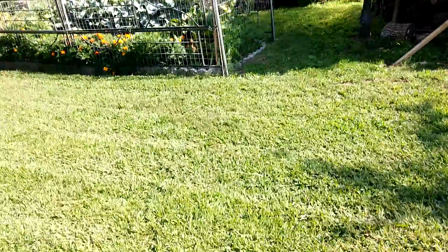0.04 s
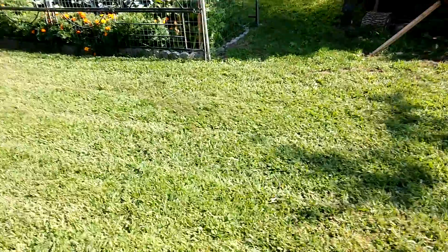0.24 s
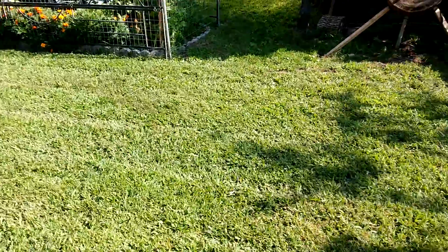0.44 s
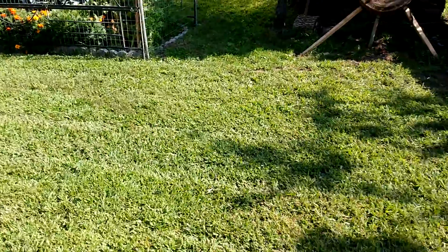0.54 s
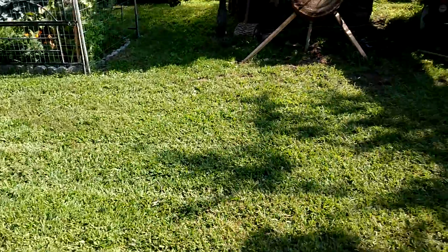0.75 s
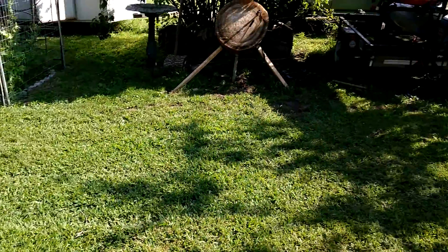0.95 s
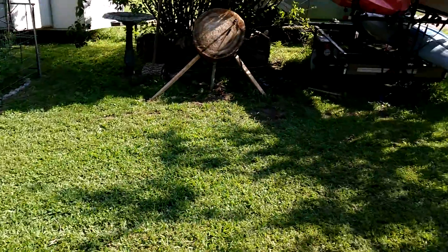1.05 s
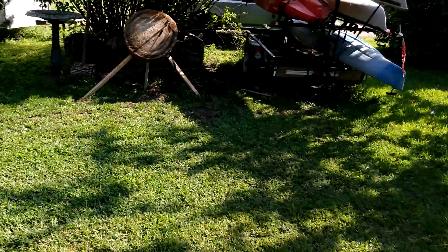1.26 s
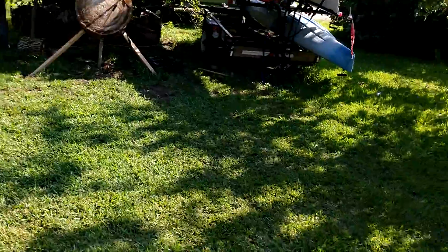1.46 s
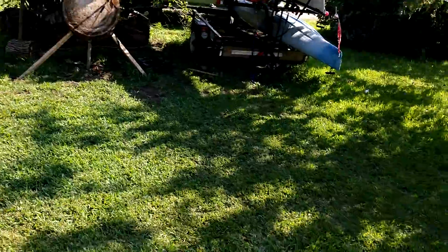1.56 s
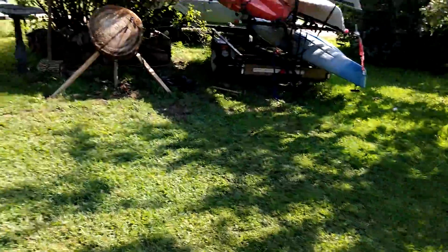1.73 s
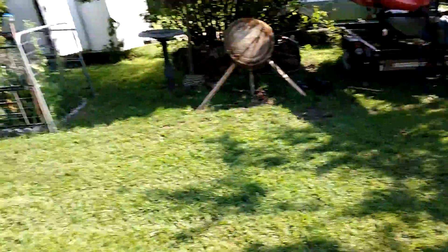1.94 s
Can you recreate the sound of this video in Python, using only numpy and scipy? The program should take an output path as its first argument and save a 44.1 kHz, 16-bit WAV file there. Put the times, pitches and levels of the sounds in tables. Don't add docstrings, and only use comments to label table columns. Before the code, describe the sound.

A thrown knife hits a wooden block with one hard, cracking knock in a quiet backyard.

```python
import sys
import numpy as np
from scipy import signal
from scipy.fft import rfft, irfft
from scipy.io import wavfile

SR = 44100
rng = np.random.default_rng(int(sys.argv[2]) if len(sys.argv) > 2 else 0)


def gain_from_db(level_db):
    decades = np.asarray(level_db, float) / 20
    return 10 ** decades


def store_wav(level_fs):
    pcm = np.round(np.clip(np.atleast_2d(level_fs), -1, 1) * 32767)
    wavfile.write(sys.argv[1], SR, pcm.T.astype(np.int16))


N = 88200

# start in seconds, level in dB,
# lowest pitch in Hz, brightness limit in Hz.
KNOCKS = [
    (0.2414, 1, 60, 2000),
    (.2440, -4, 900, 4500),
    (.2490, -6, 700, 5000),
    (.2545, -11, 1500, 5000),
    (.2625, -14, 1200, 5080),
]


def at_hz(points, hz):
    table = np.array(points)
    return np.interp(np.log(hz), np.log(np.maximum(table[:, 0], 1)), table[:, 1])


def rms_one(x):
    return x / np.sqrt(np.mean(x ** 2) + 1e-20)


def drift(rate_hz):
    r = np.exp(-80 * np.pi * rate_hz / SR)
    slow = signal.lfilter([1], [1, -2 * r, r * r], rng.standard_normal(N // 40 + 2002))
    slow = slow[2000:]
    return np.interp(np.arange(N) / 40, np.arange(len(slow)), rms_one(slow))


def ring(x, hz, t60):
    r, w = gain_from_db(-60 / (t60 * SR)), 2 * np.pi * hz / SR
    return signal.lfilter([0, np.sin(w)], [1, -2 * r * np.cos(w), r * r], x + 1e-18)


def coloured(spectrum, alike):
    hz = np.maximum(np.arange(N // 2 + 1) * SR / N, 1)
    octaves_below = np.maximum(np.log2(spectrum[0][0] / hz), 0)
    octaves_above = np.maximum(np.log2(hz / spectrum[-1][0]), 0)
    level_db = at_hz(spectrum, hz) - 12.76 * (octaves_below + octaves_above)
    alike = np.clip(at_hz(alike, hz) if np.ndim(alike) else alike, -.99, .99)
    mid, side = rfft(rng.standard_normal((2, N)))
    pair = np.sqrt(1 + alike) * mid + np.sqrt(1 - alike) * side * [[1], [-1]]
    return rms_one(irfft(pair * gain_from_db(level_db), N))


def dying(start, t60, rise):
    t = np.maximum(np.arange(N) / SR - start, 0)
    return (1 - np.exp(-t / rise)) * gain_from_db(-60 * t / t60)


def burst(s, db, hz, t60, grit_s):
    out, kick = np.zeros(N), np.zeros(SR // 10)
    kick[:400] = rng.standard_normal(400) * np.exp(-np.arange(400) / SR / grit_s)
    tick = ring(ring(kick, hz, t60), hz, t60 / 2)
    start = int(s * SR)
    out[start:start + len(tick)] = gain_from_db(db) * tick / np.abs(tick).max()
    return out


def air():
    # pitch in Hz, level in dB per Hz.
    air_spectrum = [(150, -33), (250, -10.5), (360, -14.5), (586, -14), (697, -18), (3050, -25),
                    (4400, -34), (4960, -32.5), (15900, -51.5)]
    # pitch in Hz, left-right likeness from -1 to 1.
    likeness = [(60, 0.96), (180, 0.7), (550, 0.64), (1650, -0.5), (4970, -0.23), (15000, -0.02)]
    return gain_from_db(-54.5 + 0.52 * drift(2.1)) * coloured(air_spectrum, likeness)


def traffic():
    # pitch in Hz, level in dB per Hz.
    rumble_spectrum = [(15, -44.5), (25, 5.5), (92, -3), (129, -6.5), (147, -0.5), (172, -15.5),
                       (232, -18.5), (264, -38.5), (320, -43), (420, -66), (700, -120)]
    # time in seconds, swell in dB.
    rumble_swell = [(0, -1), (.1, 4), (.27, 1.5), (.35, 7), (.42, 3), (0.522, -1.5), (0.601, 3), (.75, 2),
                    (.85, 2), (.98, 1.5), (1.1, 0.5), (1.3, -4.5), (1.45, -1), (1.55, -2.5), (1.62, 1),
                    (1.699, -0.5), (1.85, 1.5), (2, 1.5)]
    level_db, pan_db = -39, 0.8
    swell_db = np.interp(np.arange(N) / SR, *np.transpose(rumble_swell))
    rumble = gain_from_db(level_db + swell_db + 2.2 * drift(7.7)) * coloured(rumble_spectrum, 0.95)
    return rumble * gain_from_db([[pan_db], [-pan_db]])


def machinery():
    # pitch in Hz, wander in Hz, level in dB.
    drones = [
        (126.8, 4.6, -42),
        (233.4, 2.5, -51.5),
    ]
    # time in seconds, level in dB.
    drone_swell = [(0, 0), (.1, -1.5), (.4, -1.5), (.65, -12), (.88, -2), (0.951, 0.5), (1.1, 3),
                   (1.251, 3.5), (1.381, 5.5), (1.498, -2.5), (1.621, 1.5), (1.77, 4), (1.9, -3.5), (2, -7)]
    swell = gain_from_db(np.interp(np.arange(N) / SR, *np.transpose(drone_swell)))
    out = np.zeros(N)
    for (hz, width_hz, db), gain in zip(drones, (swell, 1)):
        cycles = np.cumsum(hz + width_hz * drift(9.8)) / SR
        out += gain_from_db(db + 3.2 * drift(24)) * gain * np.sqrt(2) * np.sin(2 * np.pi * cycles)
    return out


def ticks():
    # start in seconds, pitch in Hz, 60 dB decay in seconds, pan in dB.
    clicks = [(.0342, 5800, .005, 0), (.0342, 2400, .002, 0), (.0342, 8000, .0005, 0),
              (.7925, 1800, .008, 3), (.7925, 2900, .002, 3), (1.3011, 1400, .0045, -3),
              (1.3009, 5900, .003, -3), (1.3020, 4500, .004, -3), (.565, 13500, .0007, 0),
              (.748, 9000, .001, 0), (1.557, 15300, .002, 0), (1.61, 13000, .002, 0),
              (.0342, 13500, .0005, 0)]
    click_db = [-39.5, -41.5, -43, -37, -47, -26.5, -40, -46.5, -60, -53, -44.5, -64, -57]
    out = np.zeros((2, N))
    for (s, hz, t60, pan_db), db in zip(clicks, click_db):
        out += burst(s, db, hz, t60, grit_s=.0002) * gain_from_db([[pan_db], [-pan_db]])
    return out


def touch_and_slaps():
    # start in seconds, pitch in Hz, 60 dB decay in seconds; the first is the tip.
    echoes = [(.2399, 2800, .003), (.3096, 3150, .007), (.3105, 900, .006), (.3152, 450, .006),
              (.3171, 1650, .01), (.3171, 2200, .0015), (.324, 1700, .012), (.346, 2200, .01),
              (.363, 1580, .02), (.364, 900, .015), (.368, 2400, .012), (.377, 1700, .02),
              (.386, 2900, .01)]
    echo_db = [-23, -22, -29, -26, -19, -20, -26, -32, -31, -33, -37, -38, -41]
    pan_db = 2
    slaps = sum(burst(s, db, hz, t60, grit_s=.0003) for (s, hz, t60), db in zip(echoes, echo_db))
    return slaps * gain_from_db([[pan_db], [-pan_db]])


def block_rings():
    # pitch in Hz, level in dB, 60 dB decay in seconds.
    modes = [(175, -4.5, 0.027), (312, -9.5, 0.035), (489.3, -10, 0.077), (612.7, 2, 0.044),
             (841, -2, 0.031), (983, -4, 0.05), (1104, -4, 0.025), (1267, -2.5, .04), (1652, -6, 0.06),
             (2070, -7, 0.087), (2261, -4, .065), (2455, -2, .065), (3022, -3.5, 0.05), (3163, -5.5, 0.078)]
    level_db, spread_db = -9.5, 3
    strengths = rng.standard_normal((len(KNOCKS), len(modes) + 1))
    strengths[0, :-1] = 1e-3
    strengths[0, -1] = -1
    body = np.zeros(N)
    for (s, db, low_hz, cut_hz), row in zip(KNOCKS, strengths):
        click, rings = np.zeros(SR // 5), 0
        click[0] = gain_from_db(db + level_db)
        for (hz, mode_db, t60), z in zip(modes, row):
            push = np.sign(row[-1] * z) * gain_from_db(mode_db + spread_db * z)
            rings = rings + push * ring(click, hz, t60)
        soft = signal.butter(2, [low_hz, cut_hz], "band", fs=SR, output="sos")
        start = int(s * SR)
        body[start:start + len(click)] += signal.sosfilt(soft, rings)
    return body


def wood_crack():
    # pitch in Hz, level in dB per Hz.
    crack_spectrum = [(100, -15), (300, -11.5), (600, -1), (2500, -1.5), (3800, -10), (6500, -26.5),
                      (8500, -40), (15800, -39.5)]
    shape = sum(gain_from_db(db) * dying(s, t60=0.09, rise=0.00092) for s, db, _, _ in KNOCKS)
    return gain_from_db(-13) * shape * coloured(crack_spectrum, 0.26)


def yard_tail():
    # pitch in Hz, level in dB per Hz.
    yard_spectrum = [(180, -18), (400, -9), (750, -6), (1640, -7), (2410, -8.5), (4000, -17), (7000, -38),
                     (12000, -55.5)]
    shape = dying(KNOCKS[0][0], t60=0.44, rise=0.026) * gain_from_db(2.3 * drift(27))
    return gain_from_db(-21) * shape * coloured(yard_spectrum, 0.18)


def ports(x):
    # pitch in Hz, left minus right in dB.
    balance = [(200, -.5), (700, -2), (1300, 3), (2400, 6.5), (4400, 0), (6500, -9), (9000, -14),
               (13000, -1)]
    lag_s = -.00028
    hz = np.arange(N // 2 + 1) * SR / N
    tilt = at_hz(balance, np.maximum(hz, 1)) / 2
    lag = np.exp(-2j * np.pi * hz * lag_s)
    return irfft(rfft(x) * [gain_from_db(tilt), gain_from_db(-tilt) * lag], N)


def knock():
    return touch_and_slaps() + ports(block_rings() + wood_crack() + yard_tail())


def chirps():
    # start in seconds, length in seconds, pitch in Hz, arch in Hz.
    whistles = [
        (.407, .027, 5900, 1700),
        (.441, .018, 6150, 40),
        (.455, .018, 5350, 30),
        (.47, .016, 5900, 500),
        (.487, .05, 4850, 40),
        (.499, .013, 5350, 30),
    ]
    whistle_db = [-63, -56, -58, -67, -61, -57]
    echo_s, echo_db = 0.034, -13
    out, t = np.zeros(N), np.arange(N) / SR
    waver_hz = 130 * drift(248)
    for (s, length, hz, arch_hz), db in zip(whistles, whistle_db):
        u = np.clip((t - s) / length, 0, 1)
        arch = np.sin(np.pi * u)
        cycles = np.cumsum(hz + arch_hz * arch + waver_hz) / SR
        out += gain_from_db(db) * arch ** 0.163 * np.sin(2 * np.pi * cycles)
    echoes = [gain_from_db(echo_db - 4.8 * k) * np.roll(out, int(echo_s * SR * (1.1 + 1.8 * k))) for k in range(6)]
    return (out + sum(echoes)) * gain_from_db([[-1.5], [1.5]])


def rubs():
    # start in seconds, length in seconds, start pitch in Hz, end pitch in Hz.
    strokes = [
        (.79, .055, 1750, 1850),
        (.835, .115, 1550, 1500),
        (.845, .045, 750, 600),
        (.8, .36, 3200, 3200),
        (1.21, .06, 1750, 1900),
        (1.52, .15, 2150, 2300),
        (1.63, .095, 2750, 2750),
        (1.51, .19, 5800, 5300),
        (1.52, .18, 800, 700),
        (1.86, .11, 1900, 1750),
    ]
    stroke_db = [-50.5, -54.5, -45.5, -63, -62.5, -51.5, -57.5, -66.5, -56, -53]
    stroke_q = [5, 3, 1.2, 2.5, 9, 6, 9, 2.5, 1.3, 3]
    attack_s, pan_db = .015, 4
    out = np.zeros((2, N))
    for (s, length, hz0, hz1), db, q in zip(strokes, stroke_db, stroke_q):
        i, j = int(s * SR), int((s + length) * SR)
        u = np.arange(j - i) / (j - i)
        narrow = signal.butter(2, hz0 / q / 2, fs=SR, output="sos")
        noise = signal.sosfilt(narrow, rng.standard_normal((4, SR // 2)))
        a, b, c, d = noise[:, 500:500 + j - i]
        phase = 2 * np.pi * np.cumsum(hz0 + (hz1 - hz0) * u) / SR
        mid = a * np.cos(phase) + b * np.sin(phase)
        side = c * np.cos(phase) + d * np.sin(phase)
        shape = np.minimum(u * length / attack_s, 1) * np.sqrt(1 - u ** 2)
        out[:, i:j] += gain_from_db(db) * shape * rms_one(np.array([mid + 0.46 * side, mid - 0.91 * side]))
    return out * gain_from_db([[pan_db], [-pan_db]])


def coo():
    # time in seconds, pitch in Hz, level in dB.
    call = [(1.0, 600, -75), (1.1, 593.5, -59), (1.17, 571, -70), (1.22, 610, -56), (1.29, 651, -60),
            (1.35, 591, -58), (1.401, 610, -59), (1.45, 600, -80)]
    t = np.arange(N) / SR
    s, hz, db = np.transpose(call)
    level = gain_from_db(np.interp(t, s, db) + 3.3 * drift(25)) * (t > s[0]) * (t < s[-1])
    return level * np.sin(2 * np.pi * np.cumsum(np.interp(t, s, hz)) / SR)


def slide():
    start_s, length_s = 1.49, .21
    u = np.clip((np.arange(N) / SR - start_s) / length_s, 0, 1)
    thin = signal.butter(4, 14300, "high", fs=SR, output="sos")
    hiss = signal.sosfilt(thin, rng.standard_normal((2, N)))
    return gain_from_db(-63.5 + 3.2 * drift(30)) * np.sin(np.pi * u) ** .5 * rms_one(hiss)


def scene():
    background = air() + traffic() + machinery()
    return background + ticks() + knock() + chirps() + rubs() + coo() + slide()


def noise_gate(x):
    # from seconds, to seconds.
    open_spans = [(.085, .13), (.236, .632), (.92, .945), (.97, 1.018), (1.068, 1.155), (1.198, 1.315),
                  (1.358, 1.425), (1.528, 1.572), (1.594, 1.7), (1.75, 1.8)]
    drop_db, glide_s = -8.5, .022
    t, shut = np.arange(N) / SR, np.ones(N)
    for a, b in open_spans:
        opening = np.clip((t - a) / glide_s + .5, 0, 1)
        closing = np.clip((t - b) / glide_s + .5, 0, 1)
        shut -= opening - closing
    return x * gain_from_db(drop_db * shut)


def microphone(x):
    # pitch in Hz, gain in dB.
    colour = [(30, -19.5), (48, -1), (7000, 2), (10000, 5.5), (14500, 9.5), (15800, 7), (16100, -33)]
    edge = SR // 4
    wide = np.pad(x, ((0, 0), (edge, edge)), "reflect")
    size = wide.shape[1]
    hz = np.maximum(np.arange(size // 2 + 1) * SR / size, 1)
    return irfft(rfft(wide) * gain_from_db(at_hz(colour, hz)), size)[:, edge:edge + N]


def band_limit(x):
    return signal.sosfilt(signal.butter(12, 16380, fs=SR, output="sos"), x)


def record(dry):
    clip_top = .93
    mix = clip_top * np.tanh(microphone(noise_gate(dry)) / clip_top)
    return band_limit(mix)


dry = scene()
out = record(dry)
store_wav(out)
```